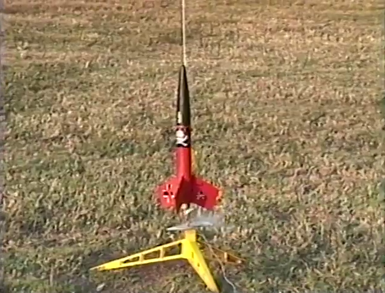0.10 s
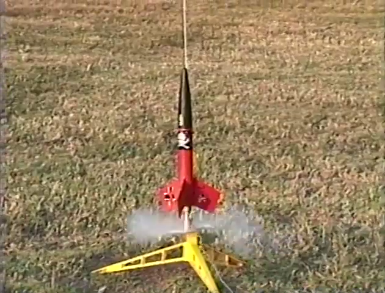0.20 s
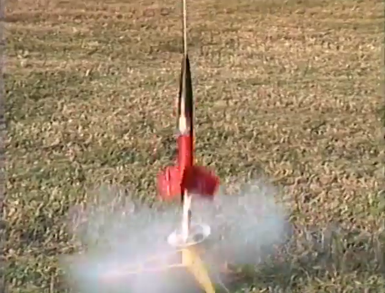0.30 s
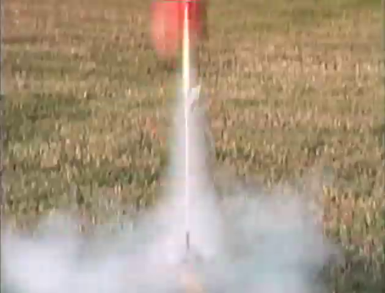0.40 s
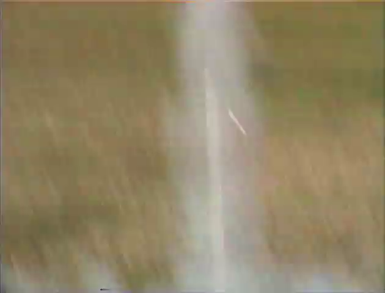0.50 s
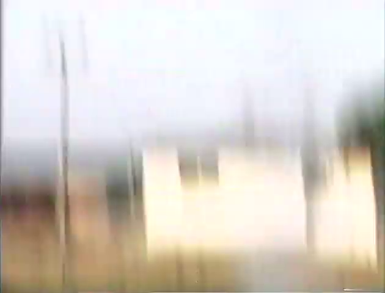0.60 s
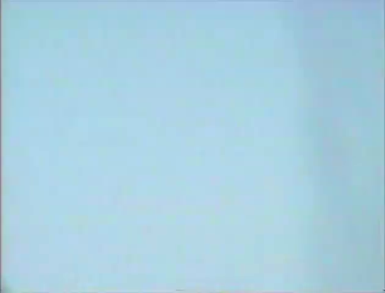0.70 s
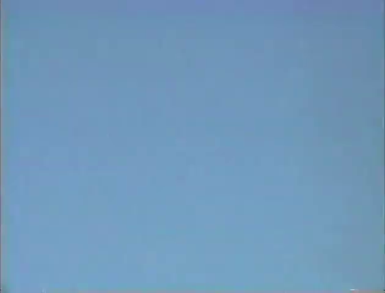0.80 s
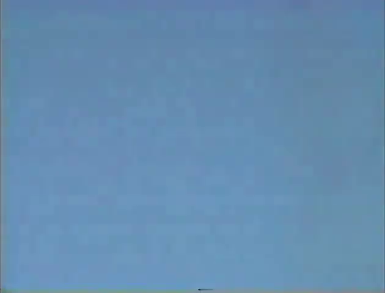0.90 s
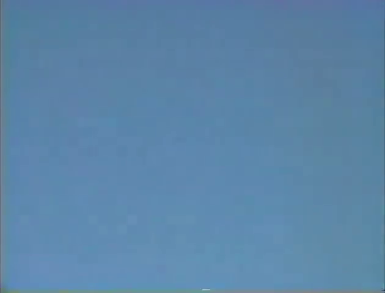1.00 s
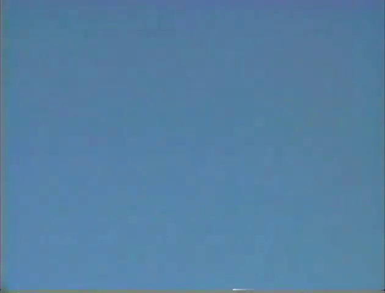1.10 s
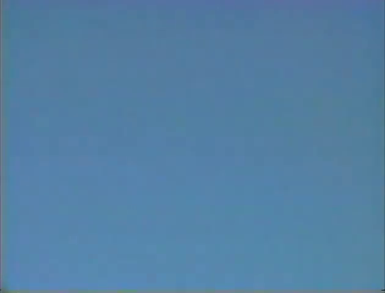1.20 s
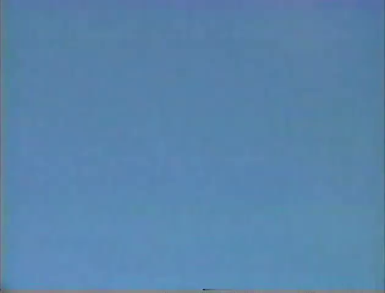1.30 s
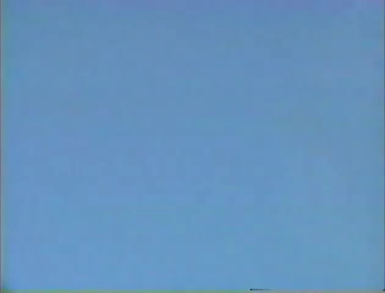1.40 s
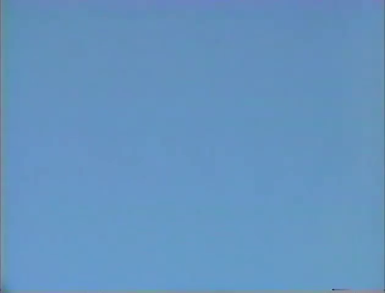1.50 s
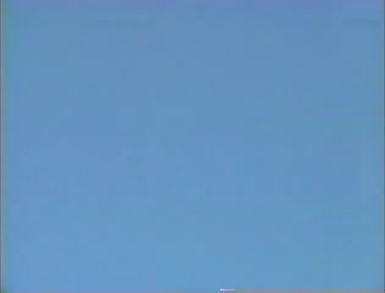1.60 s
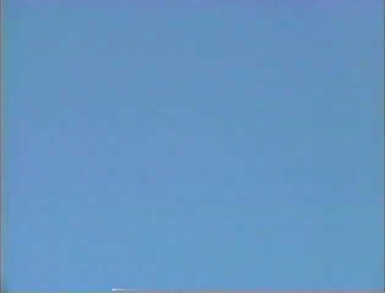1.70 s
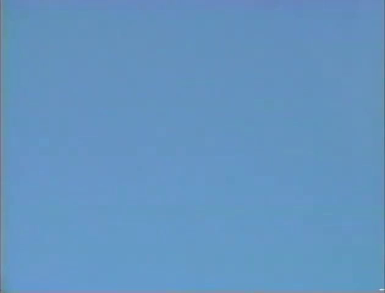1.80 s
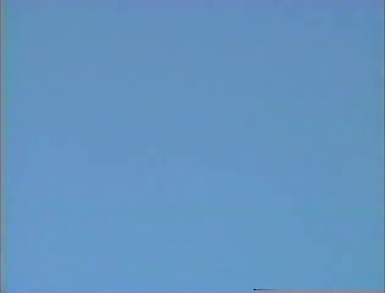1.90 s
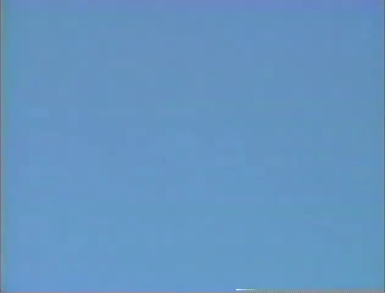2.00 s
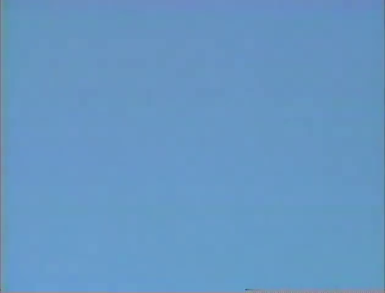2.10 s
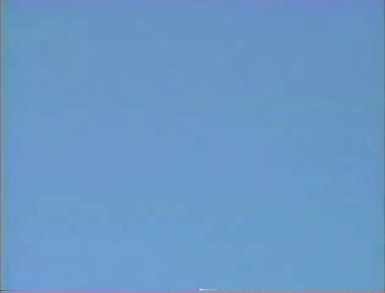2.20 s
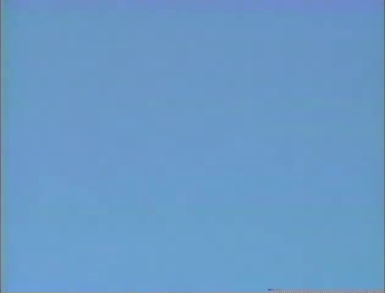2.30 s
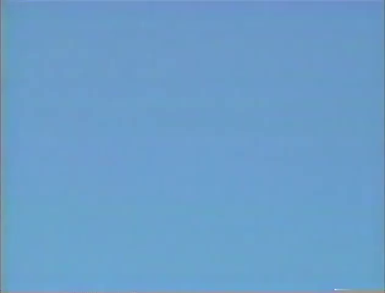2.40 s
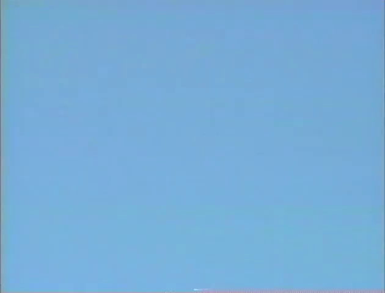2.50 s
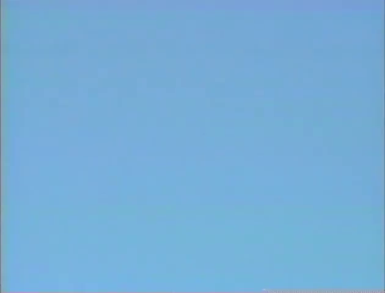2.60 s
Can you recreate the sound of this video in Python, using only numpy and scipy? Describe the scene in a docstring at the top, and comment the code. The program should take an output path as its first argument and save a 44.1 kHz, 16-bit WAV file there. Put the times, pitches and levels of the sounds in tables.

```python
"""A model rocket hisses loudly off its pad in an open field, spits now and then and burns out with a small pop.
The jet is five bands of noise that swell and fade, with treble fading first as the rocket climbs, and low puffs.
Spits are tiny pressure pulses, lift-off adds a thump of noise, and the pop is fading tones with a noisy tail.
The jet's colour changes as the microphone tilts up. Behind it lie a low hum, a thin whine and outdoor noise."""
import sys
import numpy as np
from scipy import signal
from scipy.fft import rfft, irfft
from scipy.io import wavfile

SR = 44100
rng = np.random.default_rng(int(sys.argv[2]) if len(sys.argv) > 2 else 0)


def file_out(sig):
    """Save sig as 16-bit WAV at sys.argv[1]."""
    # one column per channel
    cols = np.atleast_2d(sig).T
    # limit, then scale
    lim = np.clip(cols, -1, 1)
    pcm = np.round(lim * 32767).astype(np.int16)
    wavfile.write(sys.argv[1], SR, pcm)


N = 114660
TIME = np.arange(N) / SR   # seconds
FREQS = np.maximum(np.arange(N // 2 + 1) * SR / N, 1)   # Hz, kept above zero for the logarithms

# How the jet's layers swell and fade, before their random unevenness, from deep to bright.
# Each row: time in seconds, level in dB.
RUMBLE_LEVEL = [(.12, -61), (.25, -53), (.295, -44.5), (.315, -41), (.35, -35), (.39, -51), (.44, -41),
                (.47, -46.5), (.68, -45), (.76, -40.5), (.9, -40.5), (1.1, -45), (1.55, -51.5), (2.33, -54),
                (2.55, -58)]
ROAR_LEVEL = [(.1, -71), (.12, -61), (.2, -49), (.315, -31.5), (.35, -31.5), (.41, -28.5), (.95, -33.5),
              (1.35, -33), (1.8, -35.5), (2.34, -39), (2.41, -51)]
HISS_LEVEL = [(.1, -77), (.13, -49.5), (.2, -37.5), (.26, -27), (.313, -19.5), (.335, -28), (.365, -24.5),
              (.4, -22.5), (.47, -23.5), (.65, -22), (.86, -24.5), (1.22, -22.5), (1.55, -24.5),
              (1.9, -28.5), (2.33, -33), (2.375, -41), (2.405, -52.5)]
EDGE_LEVEL = [(.1, -86), (.125, -71), (.31, -32.5), (.47, -38), (.94, -29.5), (1.25, -30.5), (1.7, -36),
              (2.33, -44), (2.41, -62)]   # the bright edge of the hiss
SIZZLE_LEVEL = [(.1, -89), (.122, -51.5), (.2, -41.5), (.3, -27), (.322, -20), (.36, -21), (.4, -26.5),
                (.65, -27.5), (.85, -24), (1.1, -28.5), (1.35, -34), (1.63, -39), (1.69, -37.5), (2.0, -44),
                (2.12, -45), (2.34, -54), (2.41, -69)]   # the treble

# Tone colour of each layer, with the rocket near the pad or high overhead; the rumble has only one.
# Each row: frequency in Hz, relative strength in dB per Hz.
RUMBLE_COLOUR = [(20, 16.5), (30, 15), (45, 0.5), (110, 2.5), (180, 1), (260, 0), (350, 4.5), (480, -0.5)]
ROAR_PAD = [(260, -46), (450, -38), (502, -18), (550, -5), (702, -5.5), (768, -1.5), (1010, -3), (1650, 1),
            (2100, -6.5), (2730, -67), (4620, -120)]
ROAR_ALOFT = [(260, -71), (450, -12.5), (557, -9), (617, -5), (799, -7.5), (1100, 1), (1350, -2), (1650, 0),
              (1920, -3), (2100, -5.5), (2730, 3), (4620, -120)]
HISS_PAD = [(1240, -43), (2100, -10), (2220, -14.5), (2380, -7.5), (3060, 0.5), (3610, -0.5), (4300, -13),
            (5590, -38), (9460, -120)]
HISS_ALOFT = [(1240, -46), (2100, -14), (2860, -0.5), (3350, 2.5), (4300, -5), (5590, -34), (9460, -120)]
EDGE_PAD = [(4300, -3), (4700, 1), (5200, -4), (5700, -5), (6000, -17)]
EDGE_ALOFT = [(4300, -7), (4700, 2.7), (5200, 1.8), (5700, -0.5), (6300, -7), (6700, -19)]
SIZZLE_PAD = [(6200, -19), (6600, -10.5), (7500, -5.5), (8400, -1.5), (9100, 1), (9900, -2), (11000, -8.5),
              (11900, -15), (12700, -8), (13500, -6), (14600, -7.5), (15700, -8)]
SIZZLE_ALOFT = [(3940, -17), (6700, -10.5), (7060, -8.5), (8990, 3.5), (10300, -2.5), (12100, 2),
                (13800, -4), (15600, -16)]

# Sharp spits from the motor. Each row: time in seconds, size of the dip in dB, width in milliseconds.
SPITS = [(0.3126, -13, 0.19), (.434, -20.5, 0.28), (0.8411, -21, 0.28), (.9043, -16.5, 0.2),
         (1.2796, -9.5, 0.08), (1.5656, -13.5, 0.081), (2.029, -17, .07)]
# Colour of the lift-off thump. Each row: frequency in Hz, relative strength in dB per Hz.
BLAST_COLOUR = [(20, 1), (45, -0.5), (90, -13.5), (200, -13), (380, -23), (650, -10.5), (850, -17),
                (1100, -20)]
# Tones of the burnout pop. Each row: frequency in Hz, level before rise and decay in dB,
# time to fade by 60 dB in seconds, rise time in seconds.
POP_TONES = [(222, -33, 0.03, 0.0025), (680, -19, 0.0097, 0.0011), (1070, -24.5, 0.0094, 0.0019),
             (2930, -27.5, 0.0072, 0.00039), (4860, -29.5, 0.0048, .0003), (6700, -42, 0.0036, .0002)]
# The hum's tones. Each row: multiple of the hum rate, rms level in dB when the hiss is loudest.
HUM_TONES = [(2, -50), (3, -44), (4, -55), (5, -56.5), (6, -53.5)]
# Colour of the outdoor noise and the pop's tail. Each row: frequency in Hz, relative strength in dB per Hz.
FIELD_COLOUR = [(25, -4), (45, -0.5), (90, 6), (180, -14.5), (260, -32), (400, -30), (600, -3.5), (800, -5),
                (1050, -6.5), (1400, -17), (2100, -30.5), (3200, -29), (4200, -30), (7000, -30),
                (12000, -34)]

# How alike the two microphone ports hear noise. Each row: frequency in Hz, likeness from 0 to 1.
LIKENESS = [(60, .55), (160, .35), (300, 0.36), (480, 0.41), (740, 0.88), (1220, 0.95), (2010, 1),
            (3200, 0.99), (4300, 0.95), (5600, 0.67), (6700, 1), (8000, 0.74), (9200, 0.84), (11000, 0.89),
            (15000, 0.86)]
# How much louder the left port is. Each row: frequency in Hz, left over right in dB.
LEFT_LEAN = [(60, -5), (92, 9), (140, -6.5), (330, -6), (500, -3.5), (770, -1), (1790, -0.5), (2740, -.2),
             (4200, -4), (6000, 1), (7500, -3), (9600, -3.5), (10800, -2.5), (12400, -2), (15000, -.5)]
# How far the left port leads, for the pad and for high overhead. Each row: frequency in Hz, lead in radians.
LEAD_PAD = [(500, .1), (3800, .05), (5000, 1.7), (6000, 1.4), (6900, 1.03), (7600, 0.29), (9200, 0.24),
            (10500, .6), (12000, .7), (13000, .1), (15500, .1)]
LEAD_ALOFT = [(100, 0), (520, 0.63), (3000, 0), (4100, 0.39), (4900, 1.06), (6000, 0.94), (6700, 2),
              (7400, -1.8), (9000, 0.23), (10200, 1.5), (11100, 0.53), (14600, 1.5)]

TILT_START_S, TILT_END_S = 0.582, 0.93   # the microphone swings up to follow the rocket
SKIRT_DB_PER_OCTAVE = 89.5   # extra fall outside the range of a colour table
FLUTTER_DB, FLUTTER_PER_S = 0.69, 16   # unevenness of the burn
RELEASE_DB_PER_S, AFTERBURN_DROP_DB = 352, 14   # the jet dies to a faint smoulder
# Gusts of exhaust that buffet the ports; their level is relative to the rumble's level curve.
PUFFS_PER_S, PUFF_S, PUFF_TOP_HZ, PUFF_DB = 50, 0.002, 500, -4.5
# How much louder the left side is; below zero means the right is louder.
PUFF_LEAN_DB, SPIT_LEAN_DB, HUM_LEAN_DB = -5.5, -1.5, -2.5
SPIT_REBOUND = 0.38   # size of the rebound, as a share of the dip
BLAST_S, BLAST_WIDTH_S, BLAST_DB = 0.314, 0.013, -26.5
BURNOUT_S, POP_TAIL_DB, POP_TAIL_T60_S = 2.4226, -36, 0.048
HUM_HZ = 29.75
HUM_FOLLOWS = 0.74   # dB the hum moves for each dB the hiss moves
WHINE_HZ, WHINE_DB = 15734, -63
FIELD_DB = -56.5
CUTOFF_HZ = 15850


def jet():
    """The exhaust: turbulence makes noise at many pitches, and the uneven burn moves all of it together."""
    rumble_noise = port_noise(RUMBLE_COLOUR, (200, 450), LEAD_ALOFT)
    rumble = rumble_noise * from_db(-4.0 + 2.2 * drift(29))
    low = (rumble + from_db(PUFF_DB) * puffs()) * from_db(in_time(RUMBLE_LEVEL))
    roar = jet_layer(ROAR_LEVEL, ROAR_PAD, ROAR_ALOFT, (600, 2000), rough_db=0.8, rough_hz=120)
    hiss = jet_layer(HISS_LEVEL, HISS_PAD, HISS_ALOFT, (2400, 4200), rough_db=0.14, rough_hz=200)
    edge = jet_layer(EDGE_LEVEL, EDGE_PAD, EDGE_ALOFT, (4400, 6000), rough_db=1.4, rough_hz=203)
    sizzle = jet_layer(SIZZLE_LEVEL, SIZZLE_PAD, SIZZLE_ALOFT, (7500, 15000), rough_db=0.65, rough_hz=200)
    flutter = from_db(FLUTTER_DB * drift(FLUTTER_PER_S))
    return (low + roar + hiss + edge + sizzle) * flutter


def jet_layer(level, pad, aloft, band, rough_db, rough_hz):
    """Turbulent noise that crossfades from its pad colour to its overhead colour as the microphone tilts."""
    tilt = np.clip((TIME - TILT_START_S) / (TILT_END_S - TILT_START_S), 0, 1)
    near = np.sqrt(1 - tilt) * port_noise(pad, band, LEAD_PAD)
    high = np.sqrt(tilt) * port_noise(aloft, band, LEAD_ALOFT)
    return (near + high) * from_db(in_time(level) + rough_db * drift(rough_hz))


def puffs():
    """Gusts push the ports at random moments: clicks softened into low puffs, rms about 1."""
    happens = rng.random(N) < PUFFS_PER_S / SR
    clicks = happens * rng.uniform(0.44, 1, N) * rng.choice([-1, 1], N)
    soften = (1 + 2j * np.pi * FREQS * PUFF_S) * (1 + 1j * FREQS / PUFF_TOP_HZ)
    train = irfft(rfft(clicks) / soften, N)
    return train / train.std() * left_right(PUFF_LEAN_DB)


def spits():
    """Each spit of the motor is a sharp dip of pressure and a smaller rebound."""
    out = np.zeros(N)
    for start, db, width_ms in SPITS:
        age = (TIME - start) * 1000 / width_ms   # counted in widths
        dip = np.exp(-age ** 2)
        rebound = SPIT_REBOUND * np.exp(-(age - 2) ** 2)
        out += from_db(db) * (rebound - dip)
    return out * left_right(SPIT_LEAN_DB)


def blast():
    """At lift-off a wave of exhaust thumps the microphone: one brief swell of mostly low noise."""
    swell = np.exp(-((TIME - BLAST_S) / BLAST_WIDTH_S) ** 2)
    return port_noise(BLAST_COLOUR, (0, SR), LEAD_ALOFT) * from_db(BLAST_DB) * swell


def burnout():
    """A sharp tick opens into a hollow pop: fast-fading tones with a short scattered tail of noise."""
    age = np.maximum(TIME - BURNOUT_S, 0)
    pop = np.zeros(N)
    for hz, db, t60, rise in POP_TONES:
        onset = 1 - np.exp(-(age / rise) ** 2)
        pop += from_db(db - 60 * age / t60) * onset * np.sin(2 * np.pi * hz * age)
    fade = from_db(POP_TAIL_DB - 60 * age / POP_TAIL_T60_S) * (age > 0)
    return pop + port_noise(FIELD_COLOUR, (0, SR), LEAD_ALOFT) * fade


def hum():
    """Low tones on multiples of one rate, rising and sinking with the hiss."""
    hiss_db = in_time(HISS_LEVEL)
    swell = from_db(HUM_FOLLOWS * (hiss_db - np.max(hiss_db)))
    tones = np.zeros(N)
    for multiple, db in HUM_TONES:
        cycles = multiple * HUM_HZ * TIME + rng.random()
        tones += np.sqrt(2) * from_db(db) * np.sin(2 * np.pi * cycles)   # root 2 turns rms into peak
    return tones * swell * left_right(HUM_LEAN_DB)


def whine():
    """A steady, thin electronic whine: one very high sine tone."""
    return np.sqrt(2) * from_db(WHINE_DB) * np.sin(2 * np.pi * WHINE_HZ * TIME)


def field():
    """Faint outdoor noise: steady coloured noise with no single source."""
    return from_db(FIELD_DB) * port_noise(FIELD_COLOUR, (0, SR), LEAD_PAD)


def port_noise(colour, band, lead):
    """Coloured noise as two ports hear it, partly alike; their mean has rms 1 within the band."""
    octaves_below = np.maximum(np.log2(colour[0][0] / FREQS), 0)
    octaves_above = np.maximum(np.log2(FREQS / colour[-1][0]), 0)
    gain = from_db(at_hz(colour) - SKIRT_DB_PER_OCTAVE * (octaves_below + octaves_above))
    in_band = (FREQS > band[0]) * (FREQS < band[1])
    gain = gain / np.sqrt(np.mean(gain ** 2 * in_band))
    alike = np.clip(at_hz(LIKENESS), 0, 0.995)
    turn = at_hz(lead)
    lean = from_db(at_hz(LEFT_LEAN) / 2)
    # Both ports get the shared noise; the other noise is added on the left and subtracted on the right.
    shares = np.sqrt([(1 + alike) / 2, (1 - alike) / 2])
    shared, apart = rfft(rng.standard_normal((2, N))) * shares
    left = lean * np.exp(0.5j * turn)
    mean_size = np.sqrt(lean ** 2 + lean ** -2 + 2 * alike * np.cos(turn)) / 2
    ports = np.array([(shared + apart) * left, (shared - apart) / left])
    return irfft(ports * gain / mean_size, N)


def drift(rate):
    """Smooth random wandering with a spread of 1, weaker above the given rate in Hz."""
    slow = irfft(rfft(rng.standard_normal(N)) / (1 + (FREQS / rate) ** 2), N)
    return slow / slow.std()


def in_time(rows):
    """A level curve in dB at every sample, sinking a little further after its last point."""
    sink = np.clip((TIME - rows[-1][0]) * RELEASE_DB_PER_S, 0, AFTERBURN_DROP_DB)
    return np.interp(TIME, *np.transpose(rows)) - sink


def at_hz(points):
    """A table read at every frequency, with straight lines between points on a log pitch scale."""
    hz, value = np.transpose(points)
    return np.interp(np.log(FREQS), np.log(hz), value)


def left_right(lean_db):
    """Left and right gains whose ratio is the given lean in dB."""
    return from_db([[lean_db / 2], [-lean_db / 2]])


def from_db(db):
    """Decibels to gain."""
    return 10 ** (np.asarray(db) / 20)


def scene():
    """The rocket over the hum, the whine and the quiet field."""
    rocket = jet() + spits() + blast() + burnout()
    return rocket + hum() + whine() + field()


def record(dry):
    """A steep filter removes the very top of the sound."""
    steep_cut = signal.ellip(12, 0.1, 90, CUTOFF_HZ, fs=SR, output="sos")
    return signal.sosfilt(steep_cut, dry)


dry = scene()
out = record(dry)
file_out(out)
```